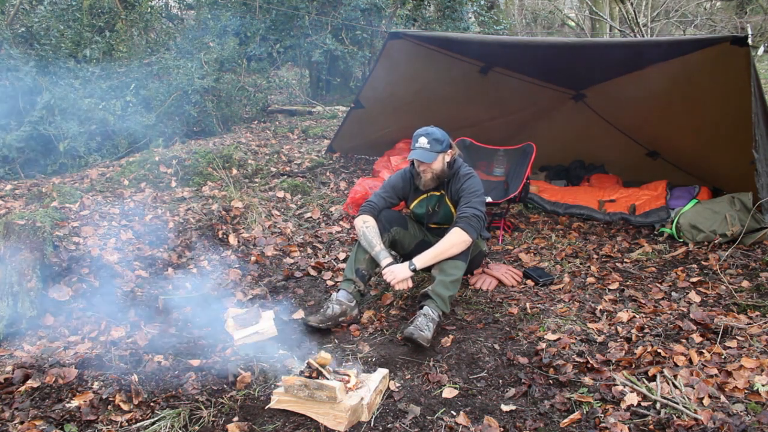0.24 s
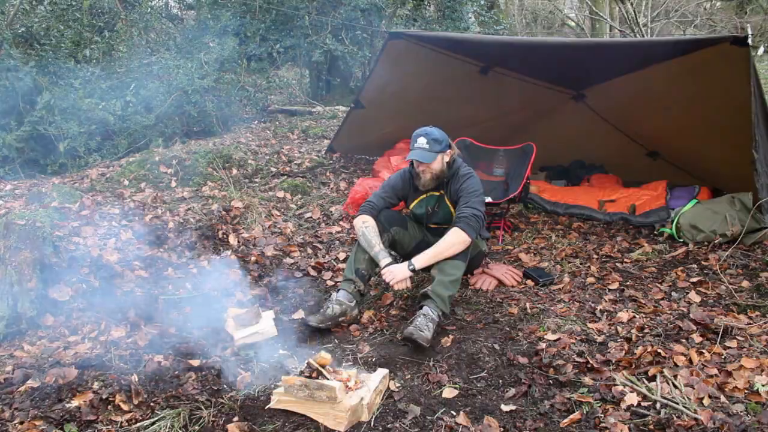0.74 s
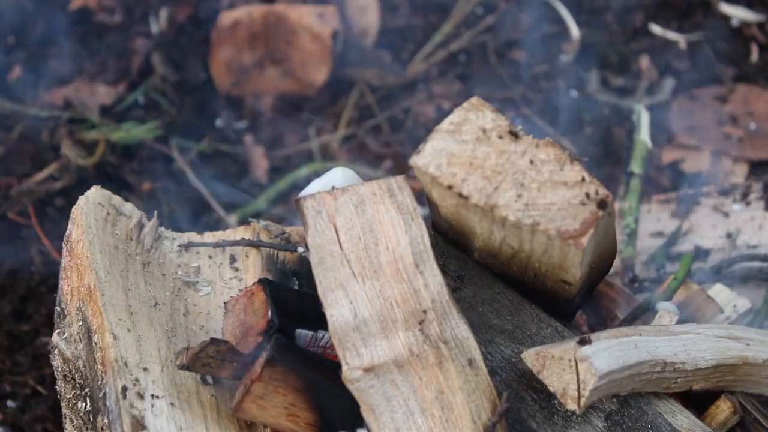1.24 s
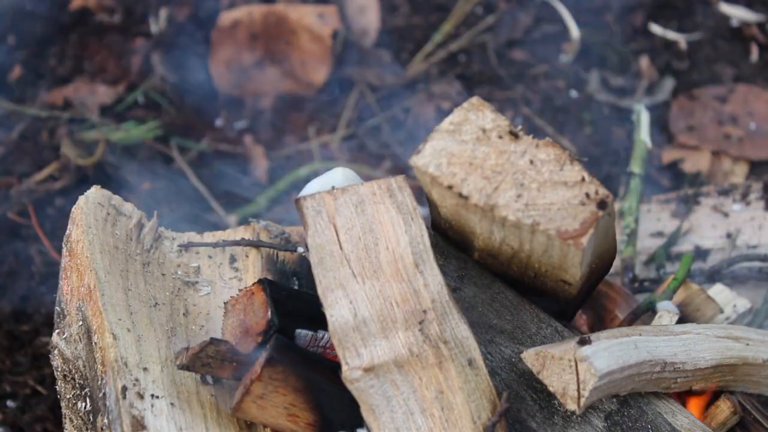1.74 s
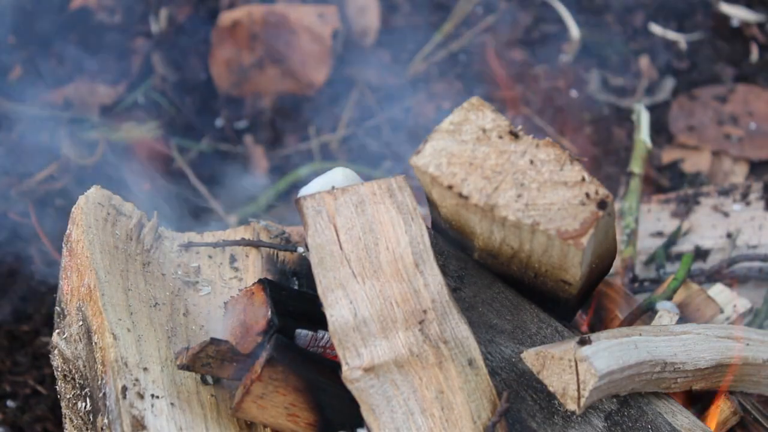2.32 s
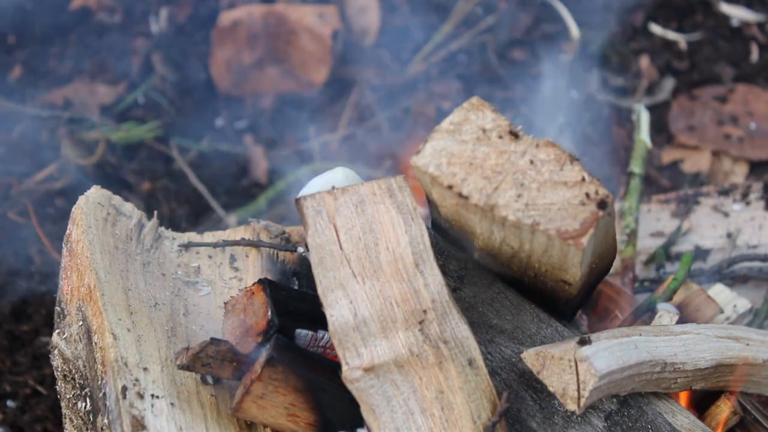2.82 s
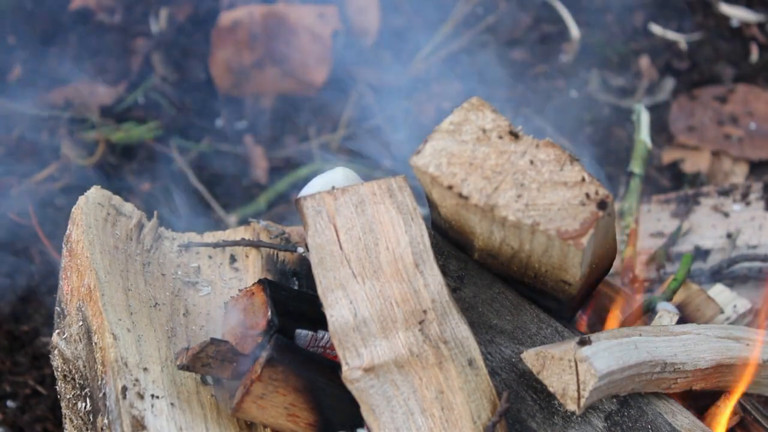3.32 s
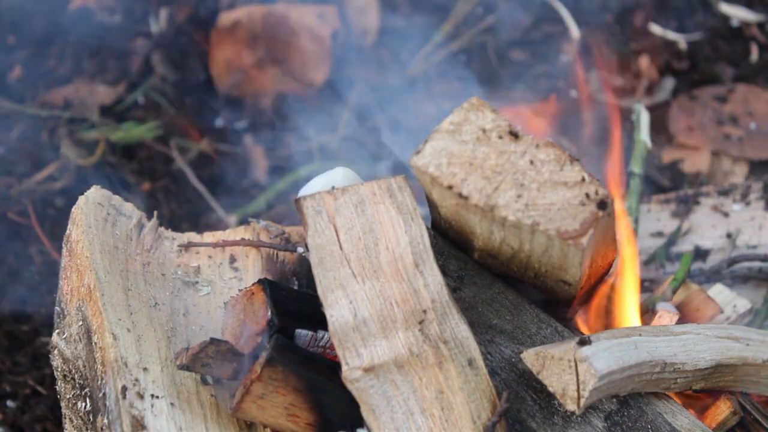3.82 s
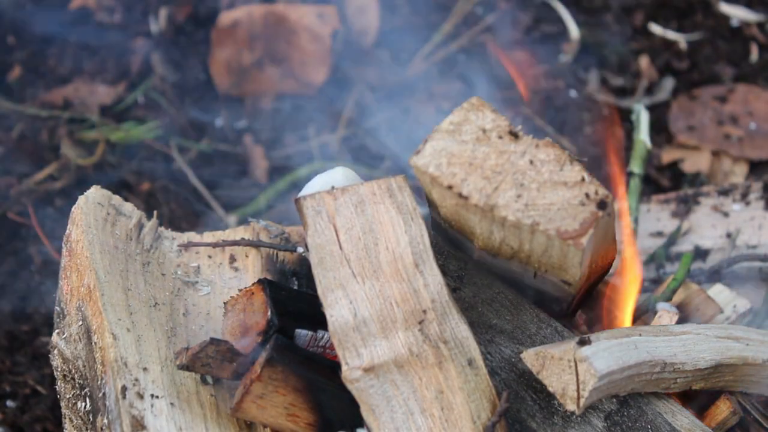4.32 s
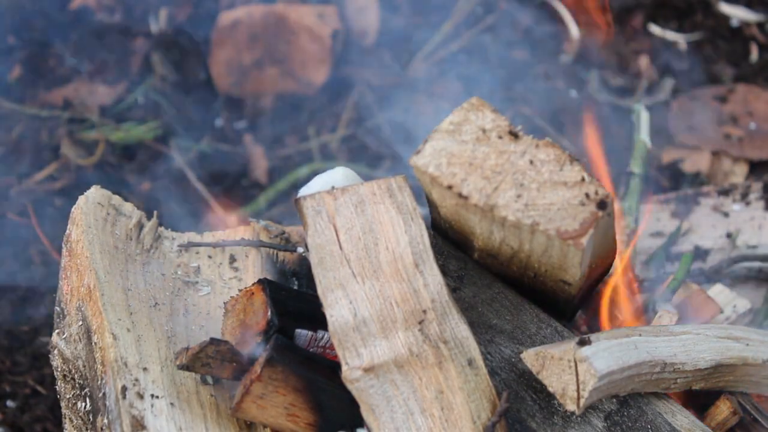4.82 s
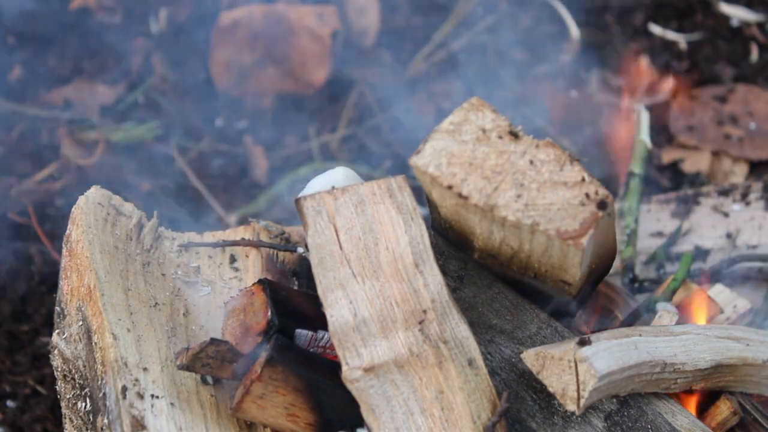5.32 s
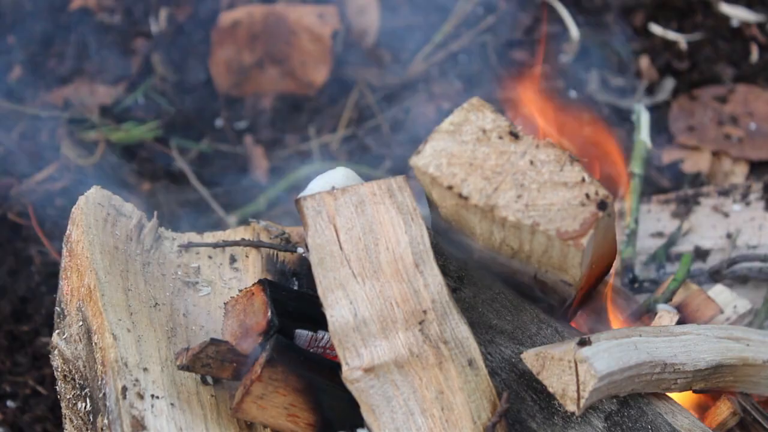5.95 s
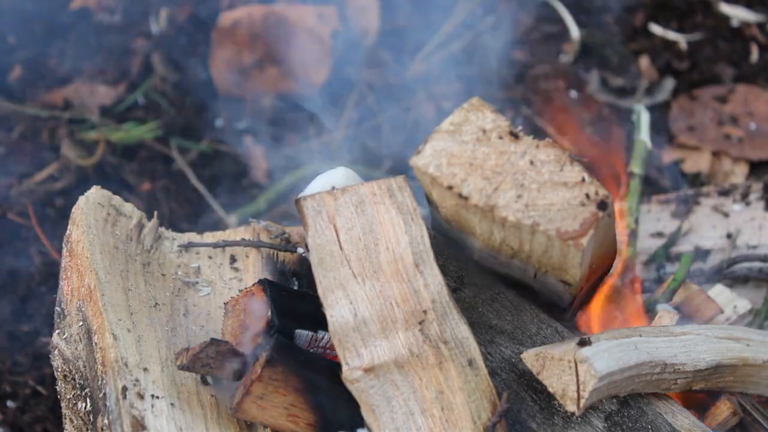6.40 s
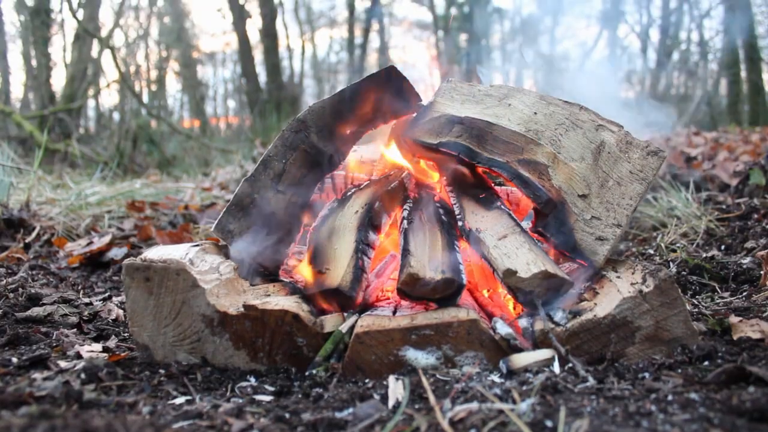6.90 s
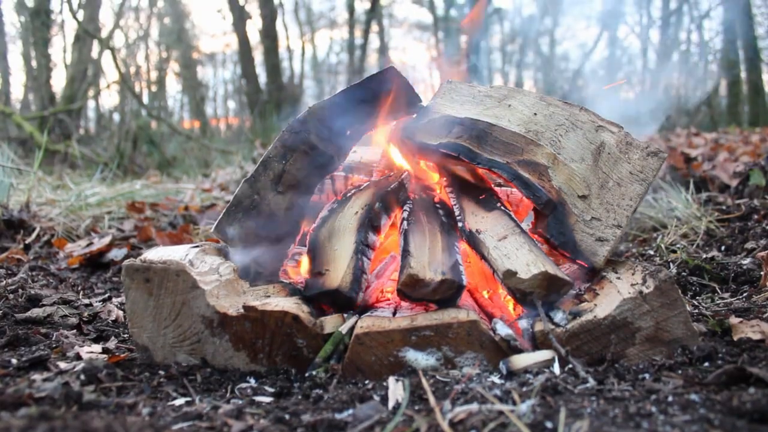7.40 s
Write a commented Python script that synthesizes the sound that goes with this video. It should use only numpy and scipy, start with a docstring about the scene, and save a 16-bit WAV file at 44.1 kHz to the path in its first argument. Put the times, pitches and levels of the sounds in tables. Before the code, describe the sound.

Damp campfire logs hiss steadily in woodland, one loud dry wood snap near the start, faint bird whistles behind, and a low flame roar at the end.

```python
"""Damp logs hiss on a campfire in woodland: steam noise heard from a few steps away, then right
over the wood, then low before a blaze, whose flames add a low roar; a few puffs thump softly.
A distant rumble and a drone are shaped noise, birds are gliding sine whistles with echoes from
the trees, and wood snaps twice as a burst of decaying modes. Both channels are the same."""
import sys
import numpy as np
from scipy import signal
from scipy.fft import rfft, irfft
from scipy.io import wavfile
from scipy.ndimage import uniform_filter1d

SR = 44100
rng = np.random.default_rng(int(sys.argv[2]) if len(sys.argv) > 2 else 0)


def wrap_up_sound(samples):
    """Save the sound to the file named by the first command line argument, as 16-bit audio."""
    columns = np.atleast_2d(samples).T
    # keep every value between -1 and 1, then stretch to whole-number steps
    tamed = np.clip(columns, -1, 1)
    steps = np.round(tamed * 32767).astype(np.int16)
    wavfile.write(sys.argv[1], SR, steps)


N = 338209
TIME = np.arange(N) / SR  # s


def amp(db):
    """Decibels to gain."""
    return 10 ** (np.asarray(db) / 20)


def unit(x):
    """Scales to rms 1."""
    return x / np.sqrt(np.mean(x ** 2) + 1e-20)


def read(points, hz):
    """Interpolates a (frequency, value) table on a log-frequency axis."""
    f, value = np.transpose(points)
    return np.interp(np.log(hz + 1), np.log(f + 1), value)


def add(mix, start_s, sound):
    """Mixes a sound in, in place, from start_s."""
    part = mix[max(round(start_s * SR), 0):][:len(sound)]
    part += sound[:len(part)]


def colour(x, spectrum):
    """Filters x by a spectrum table, then scales to rms 1."""
    hz = np.fft.rfftfreq(N, 1 / SR)
    return unit(irfft(rfft(x) * amp(read(spectrum, hz)), N))


def band(x, low_hz, high_hz, order):
    """Causal Butterworth band-pass."""
    sos = signal.butter(order, [low_hz, high_hz], "bandpass", fs=SR, output="sos")
    return signal.sosfilt(sos, x)


def wander(rate_hz):
    """Noise of rms 1 through a Gaussian low-pass, 1/e in amplitude at rate_hz."""
    hz = np.fft.rfftfreq(N, 1 / SR)
    return unit(irfft(rfft(rng.standard_normal(N)) * np.exp(-(hz / rate_hz) ** 2), N))


def after(centre_s, fade_s):
    """Linear rise from 0 to 1, centred on centre_s."""
    return np.clip((TIME - centre_s) / fade_s + .5, 0, 1)


def swell(peak_s, rise_s, fall_s):
    """Smooth hump of height 1 with separate rise and fall."""
    width_s = np.where(TIME < peak_s, rise_s, fall_s)
    return np.exp(-((TIME - peak_s) / width_s) ** 2)


def steam(spectrum, patchy_db, sputter_db, sputter_hz):
    """Many small jets leave the end grain: each wavers in its own band, and all sputter together."""
    hz, _, z = signal.stft(rng.standard_normal(N), SR, nperseg=512, noverlap=384)
    patches = uniform_filter1d(rng.standard_normal(z.shape), size=12, axis=0)  # across frequency
    patches = unit(uniform_filter1d(patches, size=24, axis=1))  # across time
    jets = signal.istft(z * amp(patchy_db * patches), SR, nperseg=512, noverlap=384)[1][:N]
    return colour(jets * amp(sputter_db * wander(sputter_hz)), spectrum)


def ground_bounce(x, delay_ms, share):
    """A microphone just above the soil hears the sound twice, which cuts evenly spaced dips."""
    hz = np.fft.rfftfreq(N, 1 / SR)
    lag_s = delay_ms / 1000
    return unit(irfft(rfft(x) * (1 + share * np.exp(-2j * np.pi * hz * lag_s)), N))


def hiss(away_db=-47.5, close_db=-39, blaze_db=-37.5):
    """Steam jets blow steadily, from three places in turn; a crack vents in spurts of its own."""
    # steam spectra by place: (frequency [Hz], relative density [dB])
    away_spectrum = [(150, -5), (330, -4), (600, -4.5), (900, -1.5), (1300, -8.5), (2000, -13.5),
                     (4000, -13.5), (5000, -14.5), (7200, -9.5), (8200, -13.5), (9400, -23), (14000, -37),
                     (15000, -43)]
    close_spectrum = [(150, -19.5), (450, -7.5), (800, -3.5), (1650, -4), (2000, -6.5), (3150, -1.5),
                      (3600, -3), (4050, -.5), (4900, -3), (5600, -0.5), (7400, -0.5), (10000, -13.5),
                      (14000, -28), (15200, -41)]
    blaze_spectrum = [(350, -13.5), (850, -5), (1130, -12.5), (1450, -2), (2100, 0.5), (2500, 1),
                      (2850, -6.5), (3600, -1), (4500, -1.5), (6000, -5), (8100, -1), (8800, -15),
                      (10000, -20.5), (15000, -45)]
    # sharp tone of the venting crack: (frequency [Hz], relative density [dB])
    spurt_spectrum = [(2000, -30), (4500, -9), (5900, -3), (7500, -2), (10000, -18.5), (15000, -47)]
    # spurts: (peak time [s], level [dB])
    spurts = [(3.72, -47), (5.72, -46), (6.25, -46.5)]
    away = amp(away_db) * steam(away_spectrum, patchy_db=-0.1, sputter_db=0.0, sputter_hz=20)
    close = amp(close_db) * steam(close_spectrum, patchy_db=0.37, sputter_db=0.22, sputter_hz=40)
    venting = sum(amp(db) * swell(peak_s, rise_s=0.23, fall_s=.27) for peak_s, db in spurts)
    close += venting * steam(spurt_spectrum, patchy_db=1.5, sputter_db=1.5, sputter_hz=30)
    blaze = steam(blaze_spectrum, patchy_db=1.3, sputter_db=0.16, sputter_hz=60)
    blaze = amp(blaze_db) * ground_bounce(blaze, delay_ms=.545, share=0.2)
    # near: place 2 onward; low: place 3
    near, low = after(1.011, fade_s=0.0073), after(6.555, fade_s=0.0054)
    return away * (1 - near) + close * (near - low) + blaze * low


def distance(rumble_db=-50.5, spread_hz=44):
    """A steady low rumble, and a drone smeared into a narrow band of noise by its long way."""
    # rumble: (frequency [Hz], relative density [dB])
    rumble_spectrum = [(12, -30), (25, -7.5), (42, -4), (62, 1), (85, -6), (120, -9), (200, -15.5),
                       (320, -16.5), (600, -30.5), (3000, -87)]
    # drone: (peak time [s], rise [s], fall [s], pitch [Hz], level [dB])
    drone_swells = [(.9, 1.0, 0.12, 235.5, -49.5), (1.22, 0.34, 0.21, 282, -55.5)]
    out = amp(rumble_db) * colour(rng.standard_normal(N), rumble_spectrum)
    for peak_s, rise_s, fall_s, hz, db in drone_swells:
        phase = 2 * np.pi * hz * TIME
        drone = unit(wander(spread_hz) * np.cos(phase) + wander(spread_hz) * np.sin(phase))
        out += amp(db) * swell(peak_s, rise_s, fall_s) * drone
    return out


def whistle(length_s, final_hz, glide, settle_s, waver=0.0017):
    """A sine that swells, then dies down, its pitch relaxing from (1 + glide) times final_hz."""
    peak_share, fade_db = .34, -19  # loudest point as a share of length; fade from there to the end
    t = np.arange(0, length_s, 1 / SR)
    u = t / length_s
    hz = final_hz * (1 + glide * np.exp(-t / settle_s)) * (1 + waver * wander(90)[:len(t)])
    attack = np.minimum(u / peak_share, 1)
    release = np.maximum(u - peak_share, 0) / (1 - peak_share)
    loudness = attack * amp(fade_db * release) * np.minimum(10 * (1 - u), 1)
    return np.sqrt(2) * loudness * np.sin(2 * np.pi * np.cumsum(hz) / SR)


def trees(x):
    """Trunks scatter sound into sparse echoes, the highest treble dying first."""
    # ring of the trees: (frequency [Hz], t60 [s])
    woods_t60 = [(300, .5), (3000, 0.59), (8000, 0.9), (15000, 0.14)]
    echoes_per_s = 900
    taps = rng.standard_normal(SR) * (rng.random(SR) < echoes_per_s / SR)
    hz, t, z = signal.stft(taps, SR, nperseg=256)
    decay = amp(-60 * t / read(woods_t60, hz)[:, None])
    tail = signal.istft(z * decay, SR, nperseg=256)[1]
    return signal.fftconvolve(x, tail / np.linalg.norm(tail))[:N]


def birds(flutter_db=2.0, echo_db=-8):
    """Three birds repeat their own whistle shapes among scattered song; the trees answer."""
    # thin, high calls dropping onto pitch: (start [s], final pitch [Hz], level before flutter [dB])
    thin_calls = [(.742, 7120, -37.5), (1.68, 7300, -48), (3.24, 7310, -42), (4.73, 7280, -54),
                  (5.49, 7260, -51)]
    # lower calls sliding upward: (start [s], final pitch [Hz], level before flutter [dB])
    rising_calls = [(2.935, 3600, -43), (5.05, 3400, -51), (5.89, 3470, -48)]
    # pips on one note: (start [s], level before flutter [dB])
    pips = [(1.06, -52), (5.28, -49), (5.483, -40.5), (5.575, -51)]
    # song: (start [s], length [s], final pitch [Hz], start above it [share], level before flutter [dB])
    song = [(.175, .08, 4900, .34, -54), (.33, .19, 4300, .08, -59), (.58, .075, 4820, 0.071, -56),
            (.73, .22, 4480, -.09, -62), (.97, 0.077, 4650, -.18, -51), (6.005, 0.17, 6350, .02, -46),
            (6.24, .09, 4170, -0.076, -45), (6.455, .09, 6270, -0.0076, -47)]
    out = np.zeros(N)
    for start_s, hz, db in thin_calls:
        add(out, start_s, amp(db) * whistle(0.25, hz, glide=.16, settle_s=.045))
    for start_s, hz, db in rising_calls:
        add(out, start_s, amp(db) * whistle(0.24, hz, glide=-.24, settle_s=.1))
    for start_s, db in pips:
        add(out, start_s, amp(db) * whistle(.1, 3810, glide=0, settle_s=.1))
    for start_s, length_s, hz, glide, db in song:
        add(out, start_s, amp(db) * whistle(length_s, hz, glide, settle_s=.19 * length_s))
    out = out * amp(flutter_db * wander(45))  # loudness trembles on the way through the twigs
    return out + amp(echo_db) * trees(out)


def snaps(ring_db=-56, ring_t60_s=.05):
    """Wood splits: a short ring of its modes, thrown back by things close by."""
    # modes: (frequency [Hz], width [Hz], level before width weighting and filtering [dB])
    modes = [(3020, 600, 5.5), (3730, 900, -4), (6000, 1500, 10), (7700, 1300, -3), (10600, 960, -16)]
    # snaps: (start [s], crack peak [dB])
    snap_times = [(.1985, -28.5), (0.9066, -5)]
    # echoes off nearby wood and ground: (delay [s], level before filtering [dB])
    near_echoes = [(.0024, -23), (.0036, -18), (.0039, -15), (.0068, -23), (.0119, -19)]
    t = np.arange(4096) / SR
    crack = np.zeros(len(t))
    for hz, width_hz, db in modes:
        decay = np.exp(-np.pi * width_hz * t)
        crack += amp(db) * width_hz * decay * np.cos(2 * np.pi * hz * t)
    # the fibres take a moment to let go, and a small splinter radiates little bass
    crack = band(crack, low_hz=550, high_hz=8250, order=3)
    crack = crack / abs(crack).max()
    paths = amp(ring_db - 60 * t / ring_t60_s) * rng.standard_normal(len(t))
    for delay_s, db in near_echoes:
        add(paths, delay_s, amp([db]))
    # twigs and leaves throw back only the short waves
    echoes = signal.fftconvolve(crack, paths)[:len(t)]
    echoes = band(echoes, low_hz=3500, high_hz=10000, order=1)
    out = np.zeros(N)
    for start_s, db in snap_times:
        add(out, start_s, amp(db) * (crack + echoes))
    return out


def puff(width_s):
    """A pocket of gas burns: one swing of the air pressure, centred in 40 ms, peak 1."""
    u = np.arange(-.02, .02, 1 / SR) / width_s
    push = u / (1 + u ** 2) ** 2
    return push / push.max()


def flames(puffs_per_s=220, roar_db=-46, puff_width_s=0.0015):
    """Small random puffs and noise merge into the roar of the blaze; large puffs stand out."""
    # roar: (frequency [Hz], relative density [dB])
    roar_spectrum = [(30, -24), (70, 0), (130, -0.5), (260, -3), (450, -7.5), (700, -17.5), (1100, -51),
                     (4000, -80)]
    # large puffs of gas catching fire: (centre time [s], peak [dB])
    large_puffs = [(1.902, -38), (1.952, -39), (6.648, -36), (6.801, -34.5), (7.096, -30.5), (7.486, -35),
                   (7.571, -36), (7.617, -31)]
    small = rng.standard_normal(N) * (rng.random(N) < puffs_per_s / SR)
    noise = rng.standard_normal(N)
    roar = unit(colour(small, roar_spectrum) + 0.65 * colour(noise, roar_spectrum))
    out = amp(roar_db) * roar * after(6.59, fade_s=0.19)
    shape = puff(puff_width_s)
    for centre_s, db in large_puffs:
        add(out, centre_s - len(shape) / 2 / SR, amp(db) * shape)
    return out


def scene():
    """One microphone feeds both channels."""
    mono = hiss() + distance() + birds() + snaps() + flames()
    return np.array([mono, mono])


def record(dry):
    """Ends the sound's treble at about 15 kHz: a linear-phase low-pass."""
    edge_hz = 15150
    lowpass = signal.firwin(511, edge_hz, window=("kaiser", 9), fs=SR)
    return signal.oaconvolve(dry, lowpass[None], "same", axes=1)


dry = scene()
out = record(dry)
wrap_up_sound(out)
```